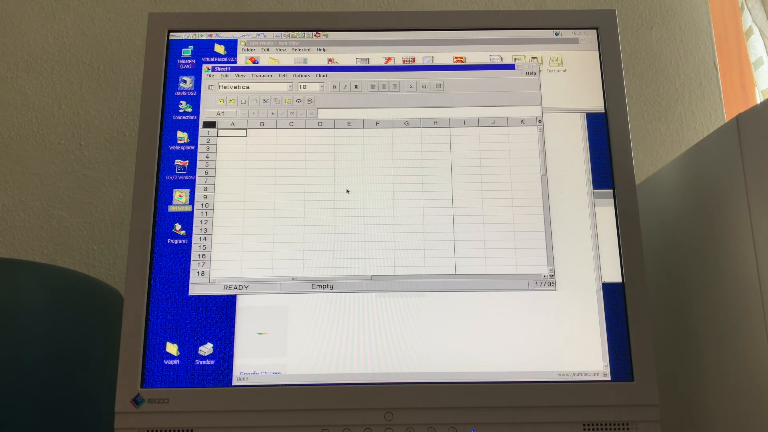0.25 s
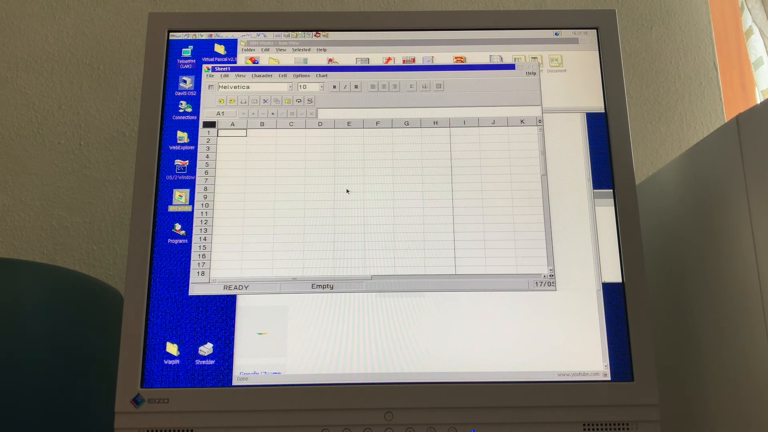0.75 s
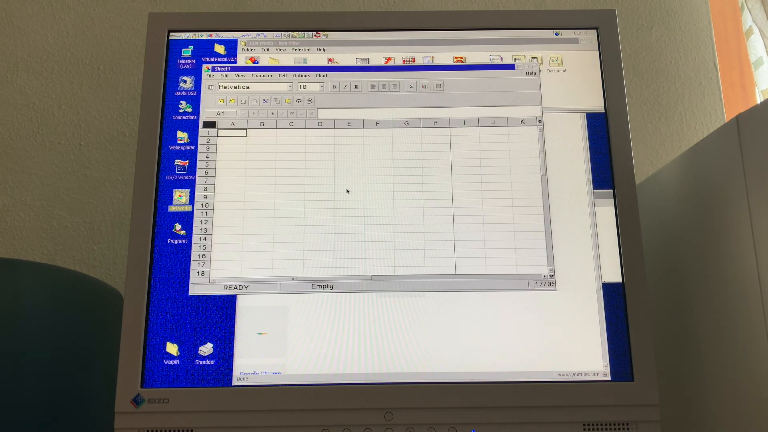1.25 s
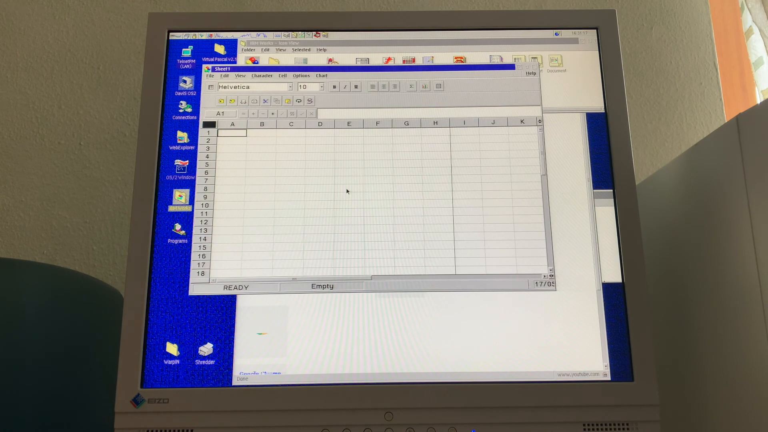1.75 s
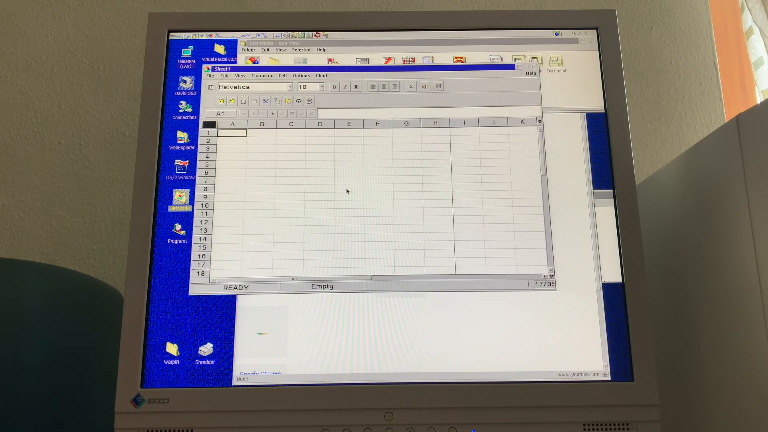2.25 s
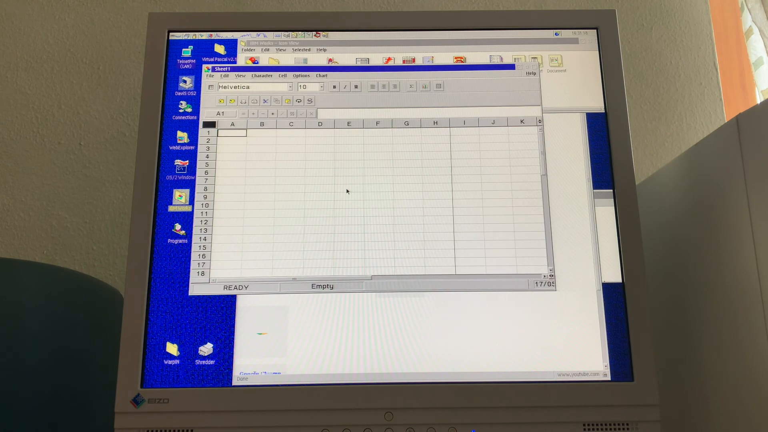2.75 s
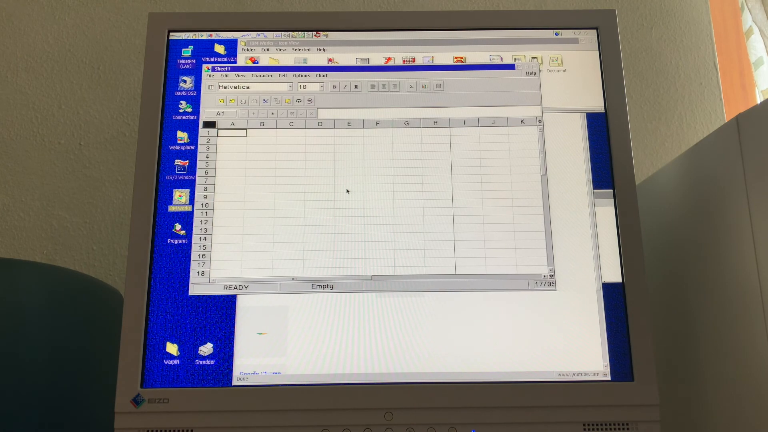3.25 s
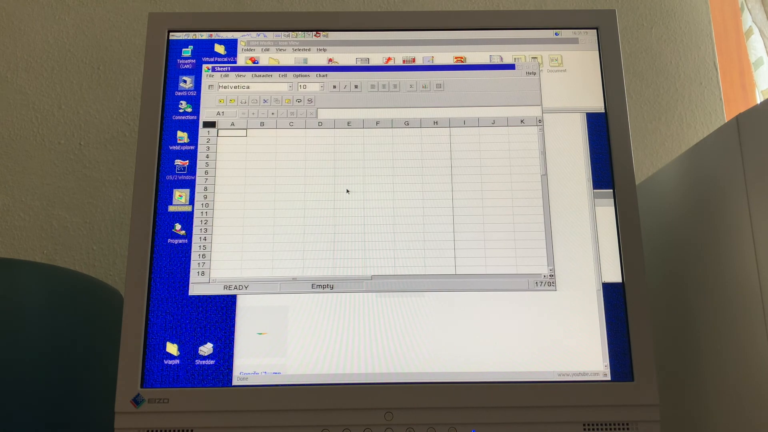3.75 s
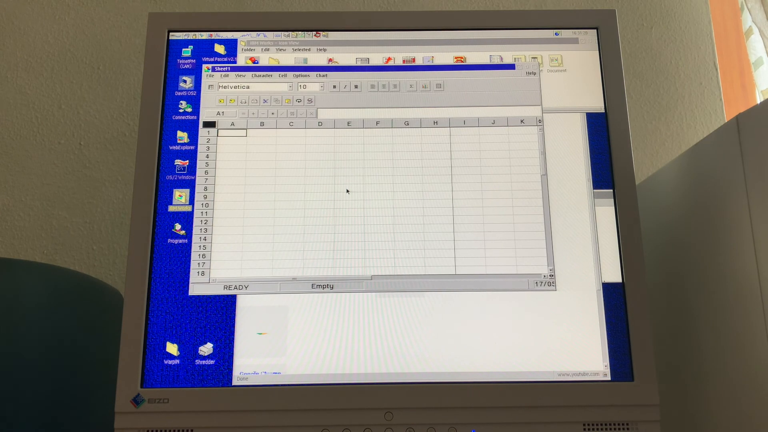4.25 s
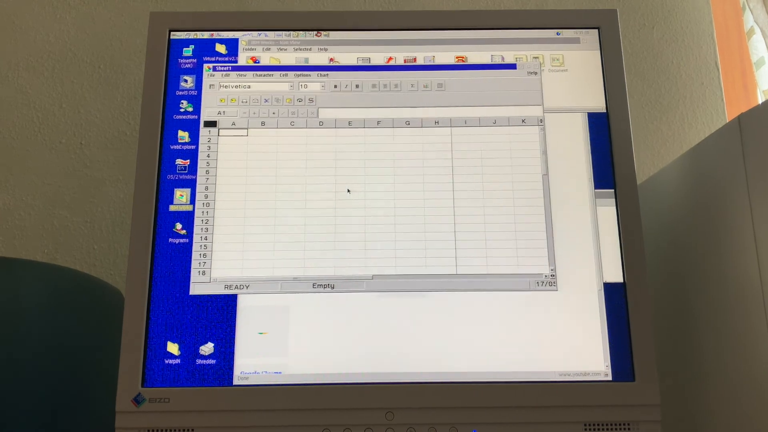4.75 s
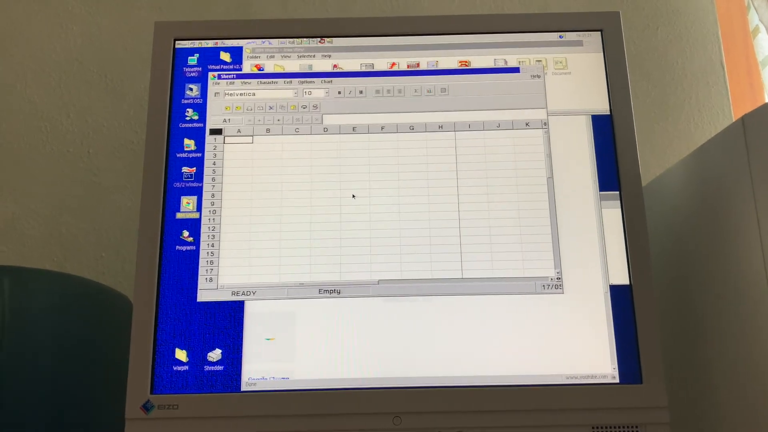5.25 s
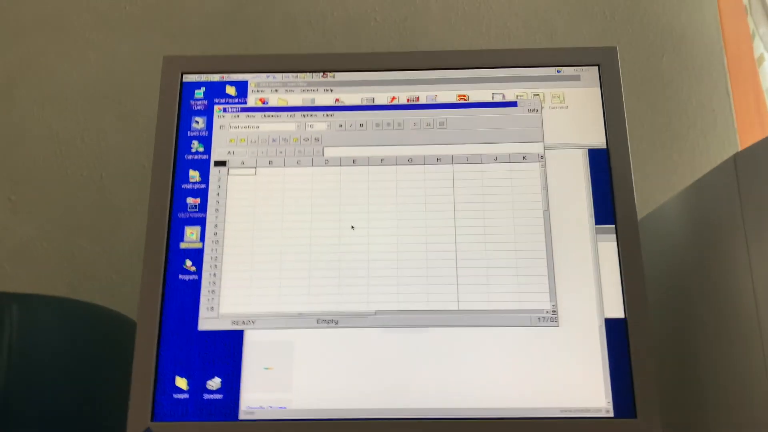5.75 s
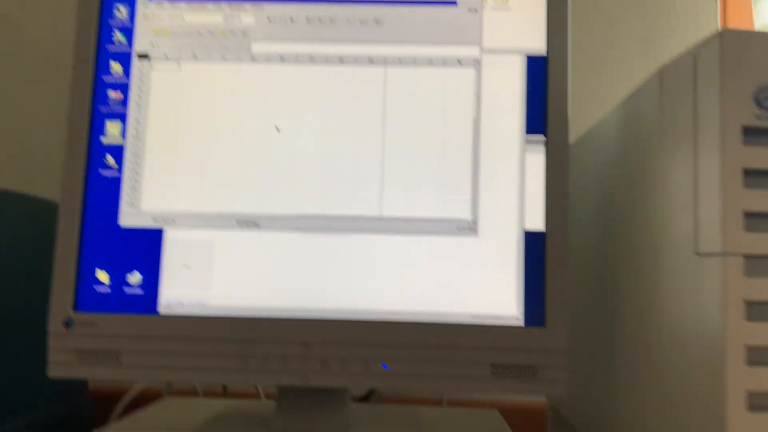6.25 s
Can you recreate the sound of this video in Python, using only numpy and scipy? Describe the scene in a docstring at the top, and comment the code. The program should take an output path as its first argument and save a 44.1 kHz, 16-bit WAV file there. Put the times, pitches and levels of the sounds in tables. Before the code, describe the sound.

Computer fans rush and drives whine steadily indoors, with one faint tick, then soft handling knocks as the microphones swing toward the vents.

```python
"""Indoors, beside a desktop computer, a hand-held pair of microphones first listens from one side, then swings round.
Fans rush and rumble: shaped noise makes the moving air, and wavering sine waves make the motor and blade tones.
Drive motors whine in close tones that beat, and ball bearings add many fine high lines.
A drive head ticks once: a few blows ring decaying sine waves over a faint noise tail.
Fingers knock (falling chirps), rub (random grains) and squeak (a rough tone) on the microphones' shell."""
import sys
import numpy as np
from scipy import signal
from scipy.fft import rfft, irfft
from scipy.io import wavfile
from scipy.ndimage import uniform_filter1d

SR = 44100
rng = np.random.default_rng(int(sys.argv[2]) if len(sys.argv) > 2 else 0)


def output_pcm(signal):
    """Save a mono or channel-first signal as 16-bit PCM at the path in sys.argv[1].

    Samples are clipped to [-1, 1] before scaling.
    """
    pcm = np.clip(np.atleast_2d(signal).T, -1, 1) * 32767
    wavfile.write(sys.argv[1], SR, np.round(pcm).astype(np.int16))


N = 287091  # length in samples

# How alike the left and right channels are in each band: pitch_hz, likeness (0 to 1)
LIKENESS = [(50, 1), (250, 0.94), (700, 0.75), (2000, 0.3), (3000, 0.96), (5600, 0.023), (7500, 0.12),
            (7950, 1), (9600, 0.86), (11000, 1), (12300, 0.11), (13000, 1), (14600, 1), (15500, 0.36)]
# Phase of the right channel relative to the left: pitch_hz, phase_radians
RIGHT_PHASE = [(0, .4), (150, .45), (700, 1.7), (2000, 1.5), (3000, 3.1), (4000, 5.4), (7000, 7.6),
               (7950, 9.42), (8750, 9.42), (10700, 12.5), (12950, 15.71), (14150, 15.71), (15400, 18.8)]

# Finger knocks on the shell, often with a high and a low part:
# start_s, level_db, end_pitch_hz, start_pitch_factor, length_s
KNOCKS = [(4.514, -43, 200, 3.3, 0.0059), (4.614, -40, 850, 1.3, 0.0039), (4.616, -37.5, 165, 1.9, 0.012),
          (4.7172, -35, 900, 1.26, 0.0063), (4.719, -45, 485, 1.35, 0.0092), (4.8367, -47, 1000, 1.8, .003),
          (4.837, -35.5, 394, 2.04, 0.01), (4.842, -39, 140, 2.3, 0.011), (4.901, -45.5, 197, 0.96, 0.018),
          (5.009, -37, 230, 5.4, 0.0095), (5.005, -40, 1090, 1.4, 0.003), (5.014, -43.5, 110, 2.8, 0.02),
          (5.063, -46.5, 500, 4.4, 0.0058), (5.301, -46, 400, 1.8, 0.0052), (5.463, -44.5, 465, 1.5, 0.012),
          (5.47, -31, 56, 1.3, 0.064), (6.472, -31, 493, 1.13, 0.0071), (6.476, -27, 900, 1.22, 0.0061),
          (6.477, -22.5, 98, 2.4, 0.0083), (6.491, -39, 624, 1.94, 0.015), (6.494, -31, 80.4, 6.3, 0.0083),
          (6.5014, -34, 474, 1.56, 0.0066), (6.505, -47, 950, 1.05, 0.009)]
# Skin sliding on the shell: start_s, length_s, level_db, change_over_stroke_db
RUBS = [(4.364, 0.079, -46.5, -9), (4.44, 0.12, -53.5, -2.5), (5.439, 0.144, -57.5, 5),
        (6.467, 0.065, -43.5, 9.5)]
# Broad ringing modes of the shell: pitch_hz, width_hz, level_db
SHELL_MODES = [(502, 190, 3), (814, 50, 11), (900, 69, 3), (252, 22, -11)]
# A brief squeak of the grip: start_s, length_s, level_db, top_pitch_hz
CREAK = (5.5, .1, -54, 570)
RUB_EDGE_S, RUB_DRY_SHARE = .007, 0.29  # fade at each end; share of plain grains beside the modes
CREAK_SAG, CREAK_FADE_DB = .25, -8  # share of pitch lost and level change at both ends

# A drive head parks: start_s, peak_db, tail_db, tail_time_to_fall_60_db_s
TICK = (2.3028, -33.5, -60, .07)
# The snap and its bounces: delay_s, level_db
TICK_BLOWS = [(0, -2), (.0012, 0), (.0045, -10), (.0075, -7), (.009, -5), (.0162, -9)]
# What each blow rings: pitch_hz, level_db, time_to_fall_60_db_s
TICK_MODES = [(950, -11, .025), (2700, -3, .007), (3100, -6, .02), (3550, 0, .011), (4370, -2, .009),
              (5700, -6, .005), (6900, -5, .004)]
# Colour of the tick's tail: pitch_hz, relative_level_db
TICK_COLOUR = [(500, -10), (3300, 0), (5500, -8), (13000, -35)]

# Air flow as the microphones move: time_s, rumble_db, rush_db, hiss_db, left_minus_right_db
MOVE = [(0, -58, -63, -57.5, -1), (.7, -55.5, -62.5, -57, -1.5), (1.05, -53.5, -62.5, -57, -1),
        (1.55, -55.5, -62.5, -57.5, -1), (2.0, -56, -62.5, -56.5, -1), (3.0, -60.5, -62, -58, -0.5),
        (3.65, -58, -62, -58, -2.5), (4.1, -51.5, -62, -59.5, -1.5), (4.5, -57.5, -61.5, -57.5, -3),
        (4.8, -61.5, -59.5, -58.5, -6.5), (5.35, -54.5, -60.5, -58, -8), (5.8, -54, -62, -58.5, -7.5),
        (6.15, -56, -61, -53.5, 2.5), (6.51, -53, -58, -54, -10.5)]
# Colours of the air's three layers: pitch_hz, relative_level_db
RUMBLE_COLOUR = [(20, -40), (30, -28), (40, -17), (60, 5.5), (100, -9.5), (167, -4), (190, -9), (230, -7.5),
                 (270, -10), (340, -22), (450, -72)]
RUSH_COLOUR = [(200, -22), (300, -10.5), (480, -1.5), (700, -10.5), (1000, -6), (1600, -5), (2200, -4),
               (2750, -9), (3050, -9), (3300, -18), (3550, -10.5), (4200, -16), (5000, -20), (6000, -24),
               (7000, -54)]
HISS_COLOUR = [(4500, -30), (6000, -18), (7300, -5), (8000, -10), (8500, -8.5), (9000, -5), (9800, -8),
               (11000, -7), (12000, 0), (13500, -4), (14100, -8), (14500, -17), (15700, -19)]
# Bands that change with the turn: low_hz, high_hz
VENT_BAND_HZ = 6300, 13100
RIGHT_BAND_HZ = 3300, 6300  # opened to the right microphone
STEADY_SHARE = 0.62  # part of the surge that the upper rumble does not follow
TURN_SHARE = 0.2  # dB per dB of turn

# Fan motor tones: pitch_hz, level_db, left_minus_right_db, wobble_rate_hz
FAN_TONES = [(58, -59, 1, 2), (89.2, -61.5, -0.5, 0.472), (119, -67.5, 1, 0.564), (164.4, -66, 0.5, 2),
             (216.4, -67.5, 0, 1.032), (476, -71, -2, 12), (633, -77, -9.5, 1.5), (950, -77, -8, 14),
             (1244.2, -73.5, -2, .5), (1582.9, -71, 0, .5), (1742, -76, 0, 2), (2100.2, -76, -2, .5),
             (2527.5, -75, -1, .5)]
# Fan blade tones: multiple_of_blade_rate, level_db, left_minus_right_db
BLADE_TONES = [(1, -68, 0), (2, -69.5, -2), (3, -79, -2), (4, -68.5, -10)]
BLADE_HZ = 236.1

# Wavering bearing and motor tones, stronger on the right: pitch_hz, level_db
RIGHT_TONES = [(2336, -77), (2670.5, -79), (3062, -80), (3456, -81), (3564, -83), (3708, -83),
               (4673.4, -84), (5190.5, -85), (5786, -84), (6158.5, -81), (6231, -81), (6302, -83)]
# Their rise and fall: time_s, change_db
RIGHT_SWELL = [(0, 0), (4.4, -4.5), (4.62, 2), (5.7, -1), (5.93, 2.5), (6.1, 3.5), (6.51, -1.5)]
RIGHT_RISE = 1.4  # dB per dB of nearness, for the tones under the right band

# Clear bearing lines, multiples of the ball rate with shaft and cage sidebands: pitch_hz, level_db
BEARING_LINES = [(5711.7, -84), (6678, -73), (6750.7, -73), (7111.3, -73), (7269.5, -62), (7594.5, -75),
                 (7789, -76), (8235.8, -73), (8308.5, -73), (8755.3, -68), (8827.3, -69), (9274.8, -75),
                 (10313.1, -72), (10457.7, -73), (10832.5, -79), (11496, -72), (11634.7, -75),
                 (11755.8, -72), (11870.9, -63), (12015.5, -74), (12029, -74), (12390.3, -73),
                 (12548.5, -74), (12649.4, -74), (15129, -78)]
# Offsets of the faint lines around each multiple: offset_hz
SIDEBANDS_HZ = -240.3, -158.6, -144.8, -72.4, 0, 72.4, 144.8, 158.6, 240.3
# How much slower each bearing's ball rate is: gap_hz
BALL_GAPS_HZ = 0, .145, .34, .58
# How loud each bearing is: level_db
BALL_SHARES_DB = 0, -4, -9, -5.5
BALL_HZ, LOW_ORDERS_DB = 519.25, -85  # ball rate; faint lines below the hiss, before their random spread

# The slowest drive's three whine tones: pitch_hz
WHINE_HZ = 2002.46, 2147.13, 2242.7
# Level change of each tone: change_db
WHINE_DB = -0.5, -0.5, -11
# Drives at nearly the same speed beat: hz_above_slowest, level_db, time_in_step_with_slowest_s
OUTER_WHINE = [(0.0, -61.6, 0.0), (1.196, -61.5, 0.779), (1.629, -61.8, 0.55), (1.958, -62.8, 0.436),
               (2.351, -72.5, 0.281), (4.9, -63.2, 0.102), (5.176, -64, 0.021)]  # lowest and top tone
MIDDLE_WHINE = [(0.0, -74.3, 0.0), (1.164, -74.3, 0.69), (1.589, -70.6, 0.276), (1.904, -70.5, 0.484),
                (2.316, -75.2, 0.415), (4.157, -77.5, 0.038), (4.822, -70.5, 0.092), (5.265, -67.5, 0.16)]
# Level of the middle tone: time_s, change_db
MIDDLE_SWELL = [(0, 0), (.25, 5.5), (.6, 0.5), (5.6, -2.5), (5.88, 7.5), (6.1, -0.5)]
# Moving changes the paths from the drives, so the beats lag: time_s, lag_s
BEAT_SLIP = [(5.8, 0), (6.2, .03)]
WHINE_WAVER_DB = 1.43  # small random change of level

EDGE_HZ = 15650  # top of the microphones' range


def gain_of(db):
    """Turns decibels into a multiplier for the wave."""
    return 10 ** (np.asarray(db) / 20)


def evened(x):
    """Scales a signal to an average strength (rms) of 1."""
    return x / np.sqrt(np.mean(abs(x) ** 2) + 1e-20)


def read(points, hz):
    """Joins the points of a table along a log-pitch axis, closer to how we hear pitch."""
    f, value = np.transpose(points)
    return np.interp(np.log(hz + 1), np.log(f + 1), value)


def curves(rows, t):
    """Joins each column of a time table with straight lines at the times t."""
    s, *columns = np.transpose(rows)
    return [np.interp(t, s, column) for column in columns]


def right_phase(hz):
    """Gives the phase of the right channel relative to the left, in radians."""
    return np.interp(hz, *np.transpose(RIGHT_PHASE))


def wander(hz):
    """Drifts slowly by chance, as a sum of slow sine waves up to the rate hz, with rms near 1."""
    t = np.arange(0, N + 512, 256) / SR
    rates = hz * np.geomspace(.1, 1, num=8)
    slow = sum(np.sin(2 * np.pi * (rate * t + rng.random())) for rate in rates)
    return np.interp(np.arange(N) / SR, t, slow / 2)


def paired(x):
    """Sends one sound to both channels, with the phase of the right one shifted by pitch."""
    hz = np.fft.rfftfreq(len(x), 1 / SR)
    right = irfft(rfft(x) * np.exp(1j * right_phase(hz)), len(x))
    return np.array([x, right])


def tone(hz, pan_db=0, bend=0):
    """Plays a sine wave in both channels; bend wobbles its phase in radians."""
    turn = 2 * np.pi * (hz * np.arange(N) / SR + rng.random()) + bend
    left = gain_of(pan_db / 2) * np.cos(turn)
    right = gain_of(-pan_db / 2) * np.cos(turn + right_phase(hz))
    return np.sqrt(2) * np.array([left, right])


def air(colour, patchy_db, pan_db=0):
    """Makes turbulent air from random short spectra with drifting patches, partly shared by both channels."""
    frames, hz = N // 512 + 5, np.fft.rfftfreq(2048, 1 / SR)
    a, b, c, d, patches = rng.standard_normal((frames, 1025, 5)).T
    patches = evened(uniform_filter1d(uniform_filter1d(patches, 12, 0), 6, 1))
    alike = np.clip(read(LIKENESS, hz), 0, 1)[:, None]
    left = a + 1j * b
    right = alike * left + np.sqrt(1 - alike ** 2) * (c + 1j * d)
    right = right * np.exp(1j * right_phase(hz))[:, None]
    # the shell shades only short waves
    shade = gain_of(pan_db / 2 / (1 + (1100 / (hz[:, None] + 1)) ** 4))
    level = gain_of(read(colour, hz)[:, None] + patchy_db * patches)
    spectra = np.array([left * shade, right / shade]) * level
    return signal.istft(spectra, nperseg=2048, noverlap=1536)[1][:, :N]


def band_even(x, lo_hz, hi_hz):
    """Scales a sound so that one band of it has rms 1."""
    band_filter = signal.butter(4, [lo_hz, hi_hz], "band", fs=SR, output="sos")
    band = signal.sosfilt(band_filter, x)
    return x / np.sqrt(np.mean(band ** 2))


def lift(x, lo_hz, hi_hz, db):
    """Raises or lowers one band by a level that may change in time."""
    band_filter = signal.butter(3, [lo_hz, hi_hz], "band", fs=SR, output="sos")
    band = signal.sosfiltfilt(band_filter, x)
    return x + (gain_of(db) - 1) * band


def shell(x):
    """Rings the shell's broad modes, each a filter that favours one pitch."""
    return sum(gain_of(db) * signal.lfilter(*signal.iirpeak(hz, hz / width, SR), x)
               for hz, width, db in SHELL_MODES)


def creak():
    """Squeaks the grip: a rough tone whose pitch and level follow one arch."""
    s, length, db, top_hz = CREAK
    u = (np.arange(N + SR) / SR - s) / length  # 0 at the start, 1 at the end
    low = 1 - np.sin(np.pi * np.clip(u, 0, 1) ** 0.52)
    roughness = evened(uniform_filter1d(rng.standard_normal(len(u)), 150))
    hz = top_hz * (1 - CREAK_SAG * low) * (1 + 0.049 * roughness)
    level = np.sqrt(2) * gain_of(db + CREAK_FADE_DB * low) * (u > 0) * (u < 1)
    return level * np.sin(2 * np.pi * np.cumsum(hz) / SR)


def rub():
    """Slides skin: stick and slip grains ring the shell's broad modes; soft skin gives no treble."""
    t = np.arange(N + SR) / SR
    happens = rng.random(len(t)) < 4000 / SR  # about 4000 grains a second
    grains = rng.standard_normal(len(t)) * happens
    ring = shell(grains) + RUB_DRY_SHARE * grains
    ring = signal.sosfilt(signal.butter(6, 1250, fs=SR, output="sos"), ring)
    ring = signal.sosfilt(signal.butter(2, 250, "high", fs=SR, output="sos"), ring)
    level = np.zeros(len(t))
    for s, length, db, change_db in RUBS:
        stroke = gain_of(db + change_db * np.clip((t - s) / length, 0, 1))
        fade = np.clip(np.minimum(t - s, s + length - t) / RUB_EDGE_S, 0, 1)
        level += stroke * fade
    return evened(ring) * level


def knocks():
    """Bends the shell: each knock is a brief chirp that slides fast at first, mostly downward, then settles."""
    out = np.zeros(N + SR)
    for s, db, hz, factor, length in KNOCKS:
        u = np.arange(0, length, 1 / SR) / length
        turns = np.cumsum(hz * factor ** ((1 - u) ** 2.57)) / SR
        swell = np.sin(np.pi * u ** 0.6) ** 2
        at = round(s * SR)
        out[at:at + len(u)] += gain_of(db) * swell * np.sin(2 * np.pi * turns)
    return out + 0.25 * shell(out)  # each knock also rings the shell


def tick():
    """Parks a drive head: a snap and its bounces ring the drive, equally in both channels."""
    s, peak_db, tail_db, t60 = TICK
    t, since = np.arange(2000) / SR, np.arange(N) / SR - s
    ring = sum(gain_of(mode_db - 60 * t / decay) * np.sin(2 * np.pi * hz * t)
               for hz, mode_db, decay in TICK_MODES)
    blows = np.zeros(N)
    for delay, blow_db in TICK_BLOWS:
        blows[round((s + delay) * SR)] = gain_of(peak_db + blow_db) / abs(ring).max()
    fading = (since > 0) * gain_of(tail_db - 60 * abs(since) / t60)
    tail = fading * evened(air(TICK_COLOUR, 0)[0])
    return signal.oaconvolve(blows, ring)[:N] + tail


def rumble_air(rumble_db, swell_db):
    """Makes the low air noise, whose upper part surges less."""
    level = gain_of(rumble_db + .8 * wander(5))
    rumble = level * band_even(air(RUMBLE_COLOUR, 1.5), 35, 130)
    return lift(rumble, 95, 450, -STEADY_SHARE * swell_db)


def rush_air(rush_db):
    """Makes the middle air noise, shaded to one side as the microphones turn."""
    frame_pan_db = curves(MOVE, np.arange(N // 512 + 5) * 512 / SR)[3]
    return gain_of(rush_db) * band_even(air(RUSH_COLOUR, 1.2, frame_pan_db), 1100, 1900)


def fans(swell_db):
    """Turns the fans: wavering motor tones, and blade tones at multiples of the blade rate."""
    out = np.zeros((2, N))
    for hz, db, pan, wobble_hz in FAN_TONES:
        level = gain_of(db + swell_db * (hz < 100) + 1.2 * wander(12))  # the lowest swell with the rumble
        out += level * tone(hz, pan, 1.5 * wander(wobble_hz))
    for k, db, pan in BLADE_TONES:
        out += gain_of(db + 2.4 * wander(15)) * tone(k * BLADE_HZ, pan, 0.24 * k * wander(6))
    return out


def right_tones(t, near_db, pan_db):
    """Sounds wavering bearing and motor tones, stronger on the right, as sines of unsteady level and phase."""
    turn_db = TURN_SHARE * pan_db
    swell_db = curves(RIGHT_SWELL, t)[0]
    out = np.zeros((2, N))
    for hz, db in RIGHT_TONES:
        rise_db = RIGHT_RISE * (hz < RIGHT_BAND_HZ[0]) * np.maximum(near_db, 0)
        level = gain_of(db + 4.4 * wander(8) + swell_db + rise_db - turn_db / 2)
        out += level * tone(hz, turn_db - 8.0, 1.7 * wander(5))
    return out


def bearings():
    """Rolls the balls: strong and faint lines, repeated by each bearing at its own rate."""
    faint_hz = np.add.outer(BALL_HZ * np.arange(3, 30), SIDEBANDS_HZ).ravel()
    under_hiss_db = np.maximum(-79.5 + read(HISS_COLOUR, faint_hz), -94)
    faint_db = np.where(faint_hz < 3400, LOW_ORDERS_DB, under_hiss_db)
    faint_db = faint_db + 2.2 * rng.standard_normal(len(faint_hz))
    hz, db = np.concatenate([np.transpose(BEARING_LINES), [faint_hz, faint_db]], axis=1)
    size = 2 ** 19
    lines = np.zeros(size // 2 + 1, complex)
    for gap, share_db in zip(BALL_GAPS_HZ, BALL_SHARES_DB):
        # a slower bearing shifts each line by its order times the gap, so high lines beat faster
        shifted_hz = hz - np.round(hz / BALL_HZ) * gap
        at = np.round(shifted_hz * size / SR).astype(int)
        phase = np.exp(2j * np.pi * rng.random(len(hz)))
        np.add.at(lines, at, gain_of(db + share_db) * phase)
    return paired(irfft(lines) * size / np.sqrt(2))[:, :N]


def treble_air(t, near_db, pan_db, hiss_db):
    """Joins the hiss and the bearing lines, with a small random change of level, then turns two bands up or down."""
    hiss = gain_of(np.median(hiss_db) - 3) * band_even(air(HISS_COLOUR, 2.5), 9000, 11000)
    lines = gain_of(1.8 * wander(14)) * bearings()  # only the lines change at random here
    treble = lift(hiss + lines, *VENT_BAND_HZ, near_db)  # the vent's band grows with nearness
    return lift(treble, *RIGHT_BAND_HZ, np.array([0 * t, -TURN_SHARE * pan_db]))


def beat(rows):
    """Adds the drives' close tones as one slow complex swing around the slowest."""
    t = np.arange(N) / SR
    t = t - curves(BEAT_SLIP, t)[0]
    return sum(gain_of(db) * np.exp(2j * np.pi * gap * (t - step)) for gap, db, step in rows)


def whine(t, near_db, pan_db):
    """Spins the drive motors: three tones, each carrying the beating of several drives."""
    outer = beat(OUTER_WHINE)
    middle = beat(MIDDLE_WHINE) * gain_of(curves(MIDDLE_SWELL, t)[0])
    out = np.zeros((2, N))
    for hz, db, swing in zip(WHINE_HZ, WHINE_DB, (outer, middle, outer)):
        level = gain_of(db + WHINE_WAVER_DB * wander(14)) * abs(swing)
        out += level * tone(hz, pan_db + 0.48, np.angle(swing))
    # turning opens the right microphone
    return out * gain_of(1.23 * np.maximum(near_db, 0) - pan_db / 2)


def computer():
    """Sums the computer's air and tones, whose levels follow the moving microphones."""
    t = np.arange(N) / SR
    rumble_db, rush_db, hiss_db, pan_db = curves(MOVE, t)
    swell_db = rumble_db - np.median(rumble_db)
    near_db = hiss_db - np.median(hiss_db)  # nearness to the vent
    moving_air = rumble_air(rumble_db, swell_db) + rush_air(rush_db)
    treble = treble_air(t, near_db, pan_db, hiss_db)
    tones = fans(swell_db) + right_tones(t, near_db, pan_db) + whine(t, near_db, pan_db)
    return moving_air + treble + tones


def scene():
    """Adds the hand on the shell, the tick and the computer, which is nearer the right microphone."""
    hand = paired(knocks() + rub() + creak())[:, :N]
    return hand + tick() + computer()


def record(dry):
    """Weakens the deepest bass as the microphones do, then cuts everything above the top edge."""
    dry = signal.sosfilt(signal.butter(3, 31, "high", fs=SR, output="sos"), dry)
    band_limit = signal.firwin(511, EDGE_HZ, window=("kaiser", 9), fs=SR)
    return signal.oaconvolve(dry, band_limit[None], "same")


dry = scene()
out = record(dry)
output_pcm(out)
```